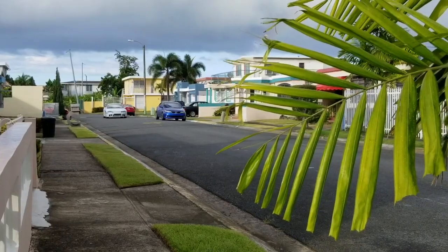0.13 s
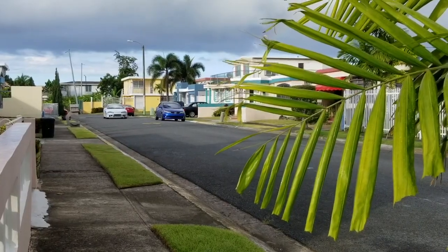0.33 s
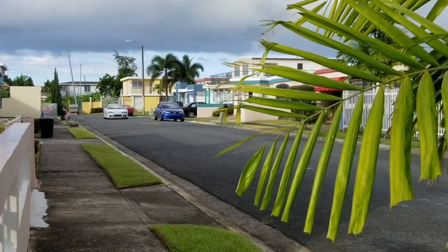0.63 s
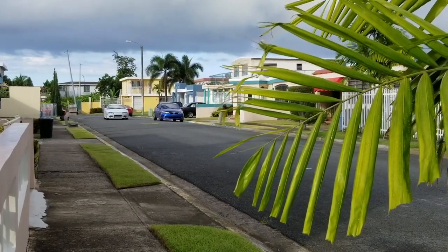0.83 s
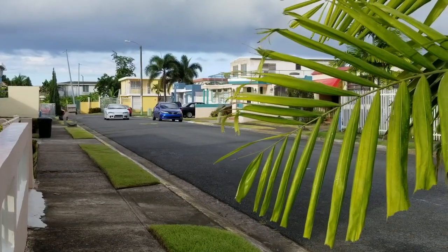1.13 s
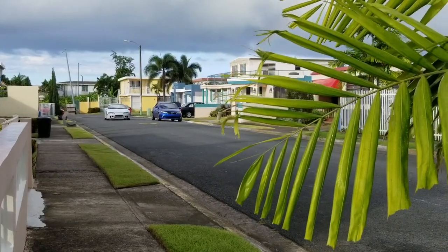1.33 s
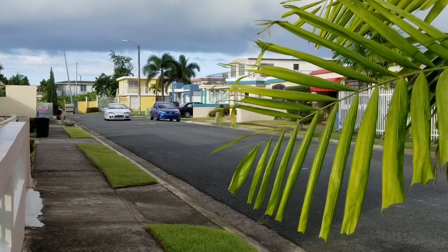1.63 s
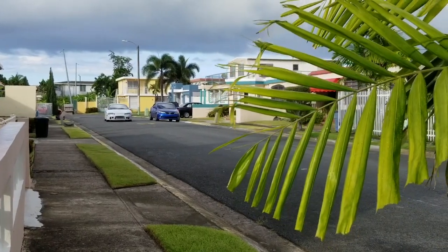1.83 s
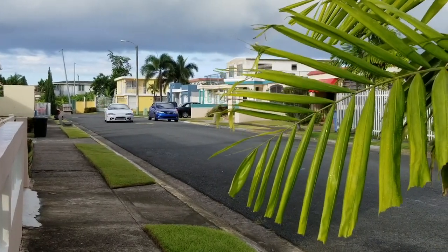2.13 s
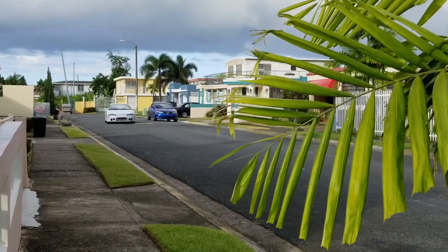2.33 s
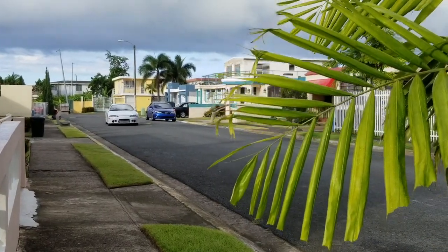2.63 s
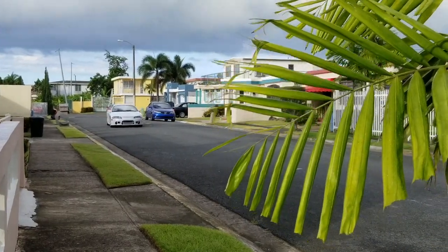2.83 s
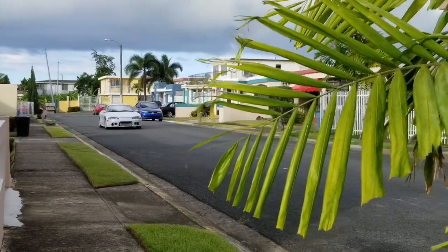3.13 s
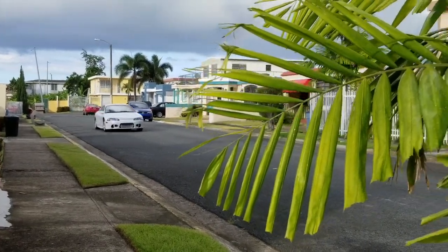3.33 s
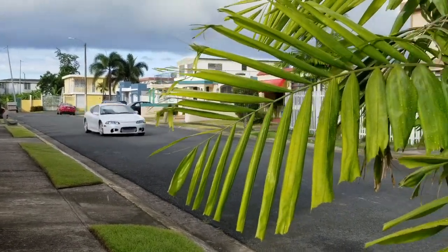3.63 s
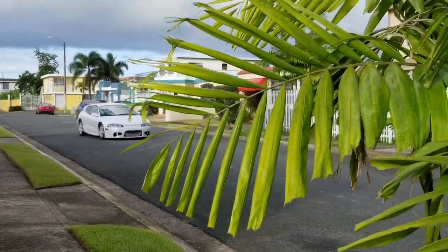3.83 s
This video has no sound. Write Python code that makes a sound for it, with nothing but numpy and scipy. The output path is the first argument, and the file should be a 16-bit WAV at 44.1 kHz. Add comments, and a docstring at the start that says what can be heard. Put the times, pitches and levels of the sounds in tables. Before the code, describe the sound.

A turbocharged four-cylinder car approaches up a residential street, faint under quiet outdoor air and tiny nearby ticks before 1 s. Its low exhaust note climbs, surging and fading among houses, with rasp and clatter. Turbo hiss grows from about 2 s, a thin whistle from 2.5. At 3.5 s the throttle lifts: pitch drops, a soft thump, then four quick chuffs with sagging hoots and rough escaping air until 4 s.

```python
"""The exhaust of a turbocharged four-cylinder car leads, heard from ahead as it accelerates up a residential street.
Wavering harmonics of the firing rate climb, swelling and fading among the houses, over rasp and engine clatter.
The turbo builds as coloured noise to a hiss, with a thin whistle of narrow noise above it.
The throttle lifts at 3.5 s and the compressor surges: four chuffs of noise bursts with falling hoots.
Quiet street air and a few high ticks lie close to the stereo microphone."""
import sys
import numpy as np
from scipy import signal
from scipy.fft import rfft, irfft, next_fast_len
from scipy.io import wavfile
from scipy.ndimage import uniform_filter1d, minimum_filter1d, map_coordinates

SR = 44100
rng = np.random.default_rng(int(sys.argv[2]) if len(sys.argv) > 2 else 0)


def log_audio(samples):
    """Write samples as a 16-bit WAV file to the path given in sys.argv[1]."""
    # one column per channel
    frames = np.atleast_2d(samples).T
    # limit to full scale, then quantise
    limited = np.clip(frames, -1, 1)
    pcm = np.round(limited * 32767).astype(np.int16)
    wavfile.write(sys.argv[1], SR, pcm)


N = 176400
T = np.arange(N) / SR

# Firing rate of the engine as heard. Each row: time in seconds, rate in Hz.
FIRING_RATE = [(0, 59.86), (.41, 63.54), (1.07, 76.05), (1.5, 84.57), (2.1, 100.8), (2.54, 114.3),
               (2.75, 124.6), (2.96, 136.1), (3.31, 153.7), (3.45, 160.1), (3.54, 154.1), (3.62, 141.1),
               (4, 143)]
# Firing note, its octave, twelfth and double octave. Each row: time in seconds, level in dB.
NOTE_LEVEL = [(0.05, -65), (0.18, -34.5), (0.35, -24.5), (0.56, -30.5), (0.78, -35), (0.97, -21),
              (1.16, -28.5), (1.3, -21.5), (1.48, -28.5), (1.54, -20), (1.8, -15.5), (1.9, -28.5),
              (1.94, -21), (2.13, -15.5), (2.23, -26), (2.33, -12.5), (2.45, -17.5), (2.5, -23),
              (2.64, -5.5), (2.78, -17.5), (2.88, -9), (2.93, -17.5), (3.02, -4.5), (3.18, -15),
              (3.23, -7.5), (3.36, -5.5), (3.45, -19), (3.56, -23.5), (3.6, -16), (3.72, -13.5),
              (3.99, -11.5)]
OCTAVE_LEVEL = [(0, -26.5), (.3, -36.5), (.39, -40), (.59, -27), (0.691, -21.5), (0.819, -30.5),
                (.89, -23.5), (1.08, -20.5), (1.16, -36.5), (1.25, -19.5), (1.341, -15), (1.4, -24),
                (1.51, -16), (1.58, -31), (1.65, -15.5), (1.75, -30.5), (1.91, -29.5), (1.98, -15),
                (2.12, -19), (2.19, -57), (2.27, -23), (2.66, -22), (3.1, -25.5), (3.249, -22), (3.37, -30),
                (3.43, -16), (3.62, -29.5), (4, -31)]
TWELFTH_LEVEL = [(0, -40.5), (.17, -25.5), (.3, -36), (.52, -32.5), (.79, -50), (1.05, -28), (1.36, -43),
                 (1.6, -34), (2.5, -32), (3.5, -62)]
DOUBLE_OCTAVE_LEVEL = [(.45, -51.5), (.8, -40.5), (1.27, -38.5), (1.55, -56), (1.96, -37.5), (2.3, -62),
                       (3.2, -38), (3.6, -43)]
# Shared level of side tones and rasp, before their own trims. Each row: time in seconds, level in dB.
EXHAUST_LEVEL = [(0, -45), (.8, -42), (1.6, -35), (2.2, -30), (2.5, -25.5), (3.0, -21), (3.5, -23),
                 (4, -37.5)]
# Side tones of the uneven firing. Each row: multiple of the firing rate, relative level in dB.
SIDE_TONES = [(.5, -18), (1.5, 0), (1.75, -7), (2.25, -7.5), (2.5, 1), (2.75, -8), (4.5, -0.5)]
# Response of the exhaust pipe to the side tones. Each row: frequency in Hz, gain in dB.
PIPE_RESPONSE = [(40, -15), (75, 10), (310, -0.5), (440, -22.5), (640, -13)]
# Spectrum of the exhaust rasp. Each row: frequency in Hz, relative density in dB per Hz.
RASP_SPECTRUM = [(30, -52), (80, 2.5), (160, 5.5), (310, 8), (390, -8.5), (470, -12), (580, -2), (830, -4),
                 (1000, -29.5)]
# Engine bay clatter, then turbo hiss. Each row: time in seconds, level in dB.
CLATTER_LEVEL = [(0, -54), (.8, -46), (1.5, -40.5), (2.1, -37), (3.4, -33), (4, -33.5)]
HISS_LEVEL = [(.7, -72), (1.2, -60), (1.7, -52.5), (2.0, -43.5), (2.5, -33.5), (3.0, -30.5), (3.5, -31),
              (3.65, -33.5), (4, -36.5)]
# Spectra of clatter, hiss, chuffs and street air. Each row: frequency in Hz, relative density in dB per Hz.
CLATTER_SPECTRUM = [(300, -38), (460, -16), (620, -7.5), (830, -22), (1030, -6), (1330, 4), (1620, -8.5),
                    (1890, 3), (2130, -1.5), (2500, -3), (3000, -10), (3560, -9), (3890, -5.5), (4500, -4),
                    (6000, -15.5), (9000, -20.5), (15000, -42)]
HISS_SPECTRUM = [(2500, -42), (4400, -10.5), (5700, -2), (7800, 3.5), (9200, -4), (13500, 3.5), (15500, -7)]
CHUFF_SPECTRUM = [(300, -21), (480, -9), (700, 3.5), (2060, -1), (2700, -2.5), (3100, -8.5), (5000, -7),
                  (12000, -14)]
STREET_SPECTRUM = [(25, -5.5), (100, 8.5), (450, -25), (2000, -23), (15000, -36.5)]
# Whistle of the turbo blades. Each row: time in seconds, pitch in Hz, level in dB.
BLADE_WHISTLE = [(2.45, 9400, -85), (2.63, 9800, -45), (2.77, 10200, -50), (2.83, 10550, -42),
                 (3.26, 11030, -39), (3.51, 11750, -40), (3.66, 11900, -85)]
# Compressor surges. Each row: peak in seconds, rise in seconds, fall in seconds, puff in dB, spit in dB.
SURGES = [(3.555, .034, .055, -25, -32), (3.705, .025, .034, -28, -29), (3.822, .02, .028, -29.5, -29),
          (3.94, .02, .025, -32, -32)]
# Hoots of the intake pipe. Each row: peak in seconds, half length in seconds, pitch at the peak in Hz,
# level in dB relative to the hoots' common trim.
PIPE_HOOTS = [(3.546, .009, 1925, -20), (3.559, .016, 900, -18), (3.587, .018, 1690, -28),
              (3.62, .011, 700, -24), (3.686, .013, 760, -23), (3.722, .014, 695, -19),
              (3.731, .011, 1310, -24), (3.82, .013, 1955, -29), (3.827, .016, 1275, -22),
              (3.858, .016, 585, -25), (3.938, .018, 570, -26), (3.942, .01, 1125, -28)]
# Air escaping between the surges. In order: peak in seconds, rise in seconds, fall in seconds.
BACKFLOW_SWELL = (3.575, .032, .42)
# Low thump as the throttle shuts. In order: peak in seconds, half length in seconds, pitch in Hz, level in dB.
THROTTLE_THUMP = (3.565, .035, 85, -24)
# Faint ticks and chirps near the microphone. Each row: peak in seconds, half length in seconds,
# pitch in Hz, level in dB.
NEARBY_TICKS = [(0.235, 0.016, 9250, -58), (0.321, 0.0014, 12600, -50), (0.8, 0.0045, 11500, -59)]
# Likeness of the left and right noise. Each row: frequency in Hz, coherence from -1 to 1.
LEFT_RIGHT_LIKENESS = [(700, 0.82), (2200, .5), (4200, 0.33), (8000, -0.18), (13000, 0)]
# Lean of the car to the left. Each row: frequency in Hz, left over right in dB.
LEFT_LEAN = [(500, 1), (2400, 2.5), (4400, 3.5), (8000, 1.5), (14000, -0.5)]

RING_HZ, RING_WIDTH_HZ, RING_DB, BACKFLOW_DB = 2070, 190, -33.5, -31
SPIT_HZ, SPIT_SAG_HZ_PER_S, SPIT_WIDTH_HZ = 14700, 5500, 4800
HOOT_SAG_PER_S, HOOT_DB = 2.2, -2
HOOT_ROUGH = .12  # wavering share of the tone's power
FRAY_HZ, FRAY_WIDTH = 4600, .25  # pitch where fray is at full level; its width as a share of the pitch
ECHO_T60_S, ECHO_DB = 0.61, -4.5
WALL_SPREAD_S = .012
LEFT_LEAD_S = 2.8e-5
TOP_HZ, CEILING = 15720, .96


def amp(db):
    """Decibels to gain."""
    return 10 ** (np.asarray(db) / 20)


def unit(x):
    """Scale to rms 1."""
    return x / np.sqrt(np.mean(x ** 2) + 1e-20)


def along(points, hz):
    """Read (Hz, value) points on a log frequency axis."""
    f, v = np.transpose(points)
    return np.interp(np.log(hz + 1), np.log(f + 1), v)


def curve(rows, axis=1):
    """One column of a time table, per sample."""
    rows = np.asarray(rows)
    return np.interp(T, rows[:, 0], rows[:, axis])


def wobble(rate):
    """A smooth random curve, rate knots a second."""
    return map_coordinates(rng.standard_normal(SR), [T * rate + 2], mode="mirror")


def filtered(x, response):
    """Apply a response of frequency to x."""
    m = next_fast_len(N + 8192)
    return irfft(rfft(x, m) * response(np.fft.rfftfreq(m, 1 / SR)), m)[..., :N]


def rush(spectrum):
    """Coloured stereo noise of rms 1, most alike between the ears in the bass."""
    def mid_side(hz):
        turn = np.arccos(np.clip(along(LEFT_RIGHT_LIKENESS, hz), -1, 1)) / 2
        return amp(along(spectrum, hz)) * [np.cos(turn), np.sin(turn)]

    mid, side = filtered(rng.standard_normal((2, N)), mid_side)
    return unit(np.array([mid + side, mid - side]))


def phase_of(hz):
    """Running phase of a moving pitch."""
    return 2 * np.pi * np.cumsum(hz) / SR


def swell(s, rise, fall):
    """A bell-shaped envelope that peaks at s."""
    distance = (T - s) / np.where(T < s, rise, fall)
    return np.exp(-.5 * np.minimum(distance ** 2, 100))


def fuzzy(phase, rough, rate):
    """A tone of rms near 1 whose size and phase waver."""
    rough = np.clip(rough, 0, 1)
    steady = np.sqrt(2 - 2 * rough) * np.sin(phase)
    wavering = wobble(rate) * np.sin(phase) + wobble(rate) * np.cos(phase)
    return steady + np.sqrt(rough) * wavering


def walls(x, wall_db):
    """Weak early copies off the road and garden walls comb the noise."""
    taps = rng.standard_normal((24, 2))
    delays = rng.uniform(0, WALL_SPREAD_S, 24)
    answer = np.zeros((SR // 20, 2))
    places = np.clip((delays * SR).astype(int), 1, len(answer) - 1)
    shared_and_own = taps[:, :1] + taps / 2
    answer[places] = amp(wall_db) * shared_and_own / np.linalg.norm(taps[:, 0])
    answer[0] = 1  # direct sound
    return unit(signal.fftconvolve(x, answer.T, axes=1)[:, :N])


def houses(x):
    """A short diffuse answer from the house fronts, different for each ear."""
    tail = rng.standard_normal((2, SR // 2)) * amp(-60 * T[:SR // 2] / ECHO_T60_S)
    return signal.fftconvolve(x[None], tail / np.linalg.norm(tail[0]), axes=1)[:, :N]


def exhaust(hz, phase):
    """Four firing harmonics, the higher the more wavering, side tones from unequal cylinders, and firing rasp."""
    levels = [NOTE_LEVEL, OCTAVE_LEVEL, TWELFTH_LEVEL, DOUBLE_OCTAVE_LEVEL]
    note = sum(amp(curve(level)) * fuzzy(k * phase, rough=0.032 * k ** 2, rate=30)
               for k, level in enumerate(levels, 1))
    sides = sum(amp(db + along(PIPE_RESPONSE, k * hz)) * fuzzy(k * phase, rough=1, rate=20)
                for k, db in SIDE_TONES)
    firing_pulse = unit(1 + np.cos(phase + wobble(90) / 2) / 2)
    rasp = rush(RASP_SPECTRUM) * firing_pulse
    return note + amp(curve(EXHAUST_LEVEL)) * (amp(-4) * sides + amp(-2.5) * rasp)


def engine_bay(phase):
    """Clatter in the engine's fixed resonances, pulsing with the firings."""
    level = amp(curve(CLATTER_LEVEL) + 0.14 * wobble(23))
    firing_pulse = unit(1 + 0.13 * np.cos(phase))
    return level * firing_pulse * walls(rush(CLATTER_SPECTRUM), wall_db=-4)


def street():
    """Quiet outdoor air with a few high ticks and chirps; the shorter, the broader."""
    ticks = sum(amp(db) * swell(s, half, half) * fuzzy(2 * np.pi * hz * T, rough=1, rate=20 / half)
                for s, half, hz, db in NEARBY_TICKS)
    return amp(-45.0) * rush(STREET_SPECTRUM) + ticks


def turbo():
    """Intake hiss grows with boost, with a lower whoosh while it spools up; the blades whistle above it."""
    hiss = amp(curve(HISS_LEVEL) + 0.35 * wobble(8.9)) * walls(rush(HISS_SPECTRUM), wall_db=-5)
    whoosh_spectrum = [(3000, -16.0), (4500, -5.5), (7000, -15), (12000, -33)]  # Hz, dB per Hz
    whoosh = amp(-34.5) * swell(2.83, 0.77, 0.28) * rush(whoosh_spectrum)
    blades = phase_of(curve(BLADE_WHISTLE))
    whistle = np.array([fuzzy(blades, rough=1, rate=260) for _ in range(2)])  # left and right
    return hiss + whoosh + amp(curve(BLADE_WHISTLE, axis=2)) * whistle


def hoot(s, half, hz, db):
    """A sagging pipe tone, frayed by a band of turbulence; the higher the hoot, the more it frays."""
    since_peak = np.clip(T - s, -half * 2, half * 2)
    phase = phase_of(hz * np.exp(-HOOT_SAG_PER_S * since_peak))
    fray = hz / FRAY_HZ * fuzzy(phase, rough=1, rate=FRAY_WIDTH * hz)
    tone = fuzzy(phase, HOOT_ROUGH, rate=130) + fray
    return amp(db) * swell(s, half, half) * tone


def flutter():
    """Trapped air bursts back through the compressor: puffs, spits that sink as the turbo slows, sagging hoots."""
    puffs = sum(amp(db) * swell(s, rise, fall) for s, rise, fall, db, _ in SURGES)
    air = puffs * amp(1.5 * wobble(170)) * rush(CHUFF_SPECTRUM)
    since_first_surge = np.maximum(T - SURGES[0][0], 0)
    centre = phase_of(SPIT_HZ - SPIT_SAG_HZ_PER_S * since_first_surge)
    bands = np.array([fuzzy(centre, rough=1, rate=SPIT_WIDTH_HZ) for _ in range(3)])  # left, right, shared
    spits = sum(amp(db) * swell(s, rise, fall) for s, rise, fall, _, db in SURGES)
    spit = spits * (bands[2] + bands[:2] / np.pi)
    hoots = sum(hoot(*row) for row in PIPE_HOOTS)
    s, half, hz, db = THROTTLE_THUMP
    thump = amp(db) * swell(s, half, half) * fuzzy(2 * np.pi * hz * T, rough=0.21, rate=63)
    return air + spit + thump + amp(HOOT_DB) * (hoots + amp(ECHO_DB) * houses(hoots))


def backflow():
    """Rough air keeps escaping between the surges and rings the intake."""
    bands = np.array([fuzzy(2 * np.pi * RING_HZ * T, rough=0.8, rate=RING_WIDTH_HZ) for _ in range(3)])
    ring = unit(bands[2] + bands[:2] / 2)  # shared, plus some of each ear's own
    air = amp(2.53 * wobble(120)) * rush(CHUFF_SPECTRUM)
    return swell(*BACKFLOW_SWELL) * (amp(RING_DB) * ring + amp(BACKFLOW_DB) * air)


def scene():
    """The car approaches; its treble mostly leans left and its sound reaches the left microphone just first."""
    hz = curve(FIRING_RATE)
    phase = phase_of(hz)
    car = exhaust(hz, phase) + engine_bay(phase) + turbo() + flutter() + backflow()

    def placement(f):
        # the phase lead stops growing above 2 kHz
        lead = np.exp(-2j * np.pi * LEFT_LEAD_S * np.outer([-.5, .5], np.minimum(f, 2000)))
        return lead * amp(np.outer([.5, -.5], along(LEFT_LEAN, f)))

    return filtered(car, placement) + street()


def record(dry):
    """A limiter holds the loudest swells, then a band limit removes everything above it."""
    need = np.minimum(1, CEILING / (np.abs(dry).max(axis=0) + 1e-9))
    gain = uniform_filter1d(minimum_filter1d(need, size=1201), size=601)
    return filtered(dry * gain, lambda hz: hz < TOP_HZ)


dry = scene()
out = record(dry)
log_audio(out)
```